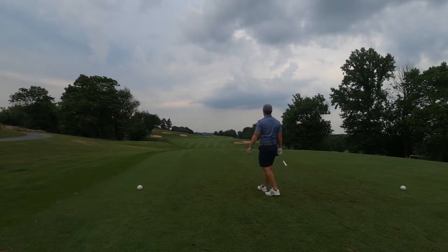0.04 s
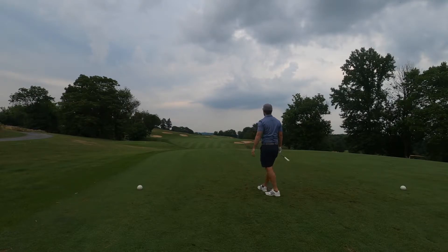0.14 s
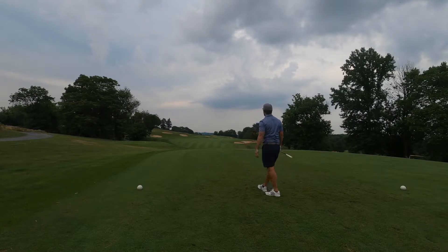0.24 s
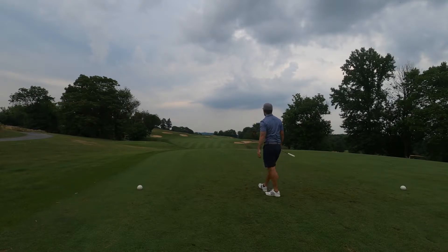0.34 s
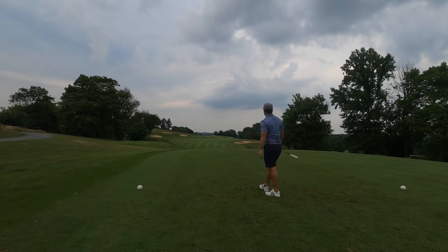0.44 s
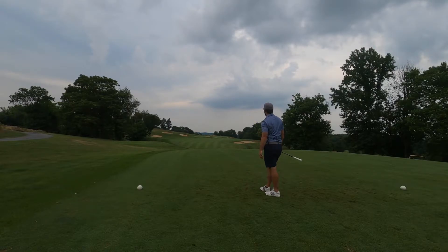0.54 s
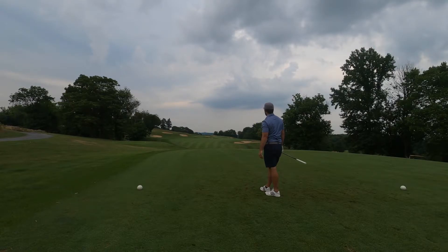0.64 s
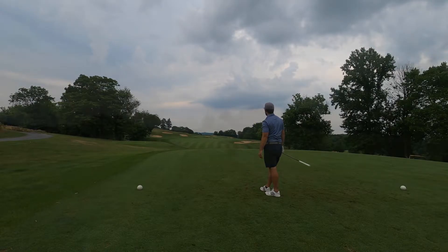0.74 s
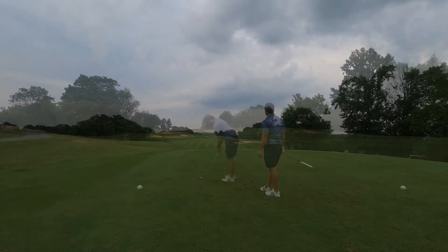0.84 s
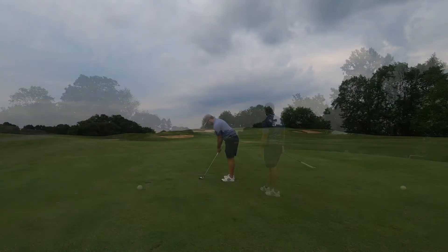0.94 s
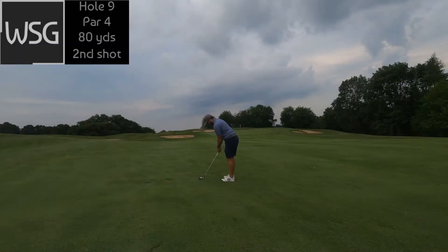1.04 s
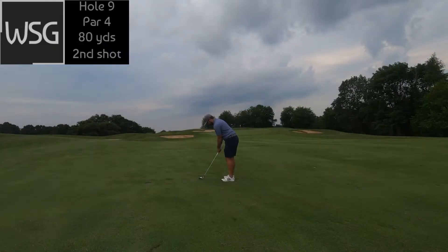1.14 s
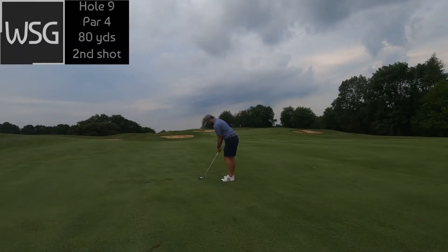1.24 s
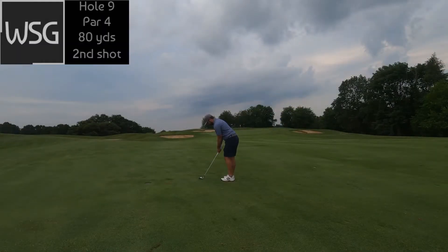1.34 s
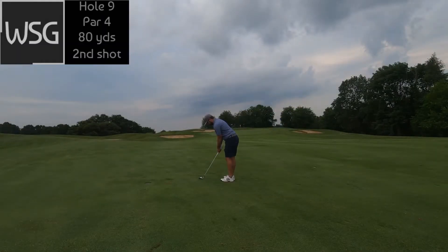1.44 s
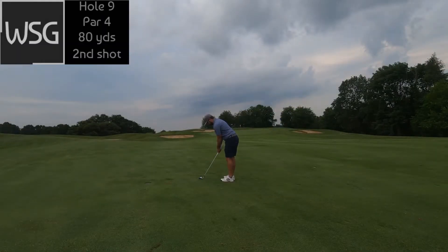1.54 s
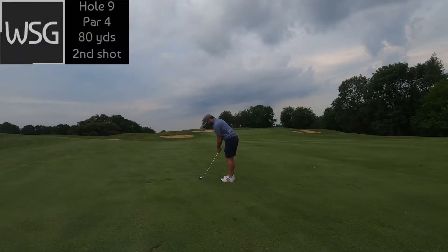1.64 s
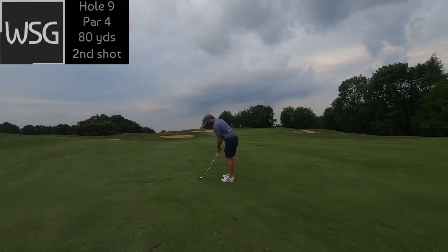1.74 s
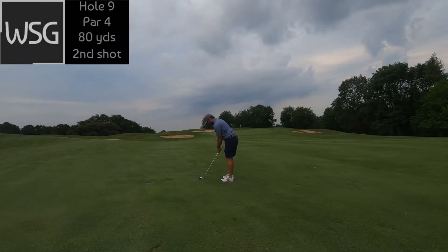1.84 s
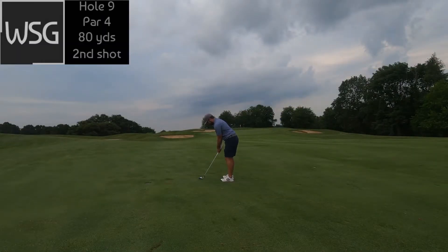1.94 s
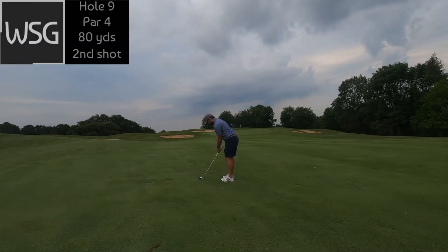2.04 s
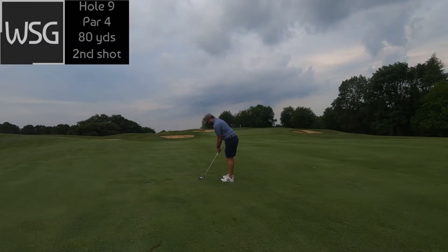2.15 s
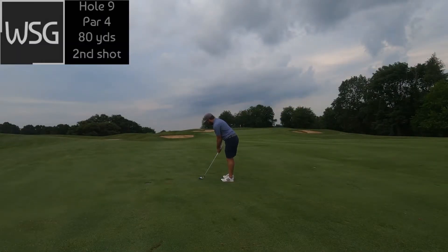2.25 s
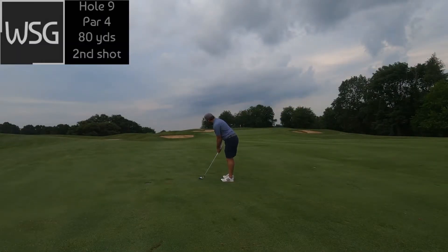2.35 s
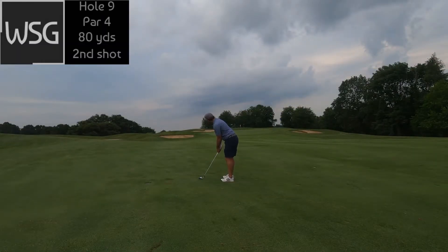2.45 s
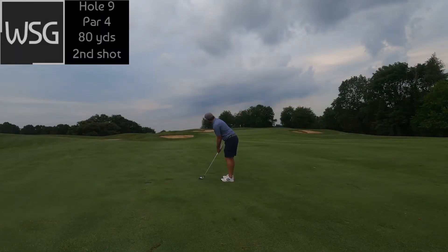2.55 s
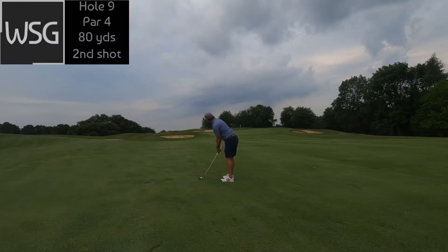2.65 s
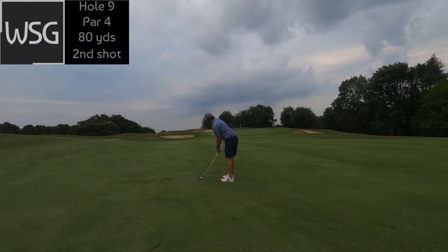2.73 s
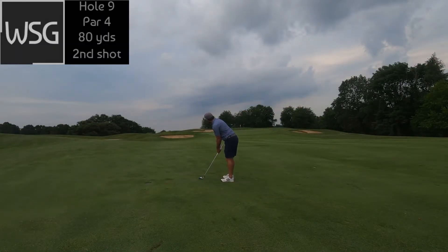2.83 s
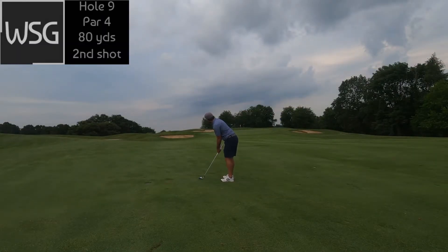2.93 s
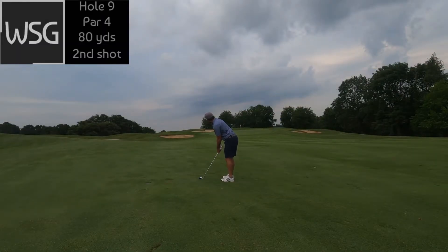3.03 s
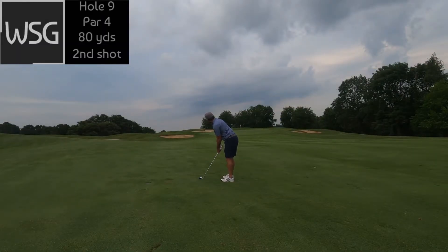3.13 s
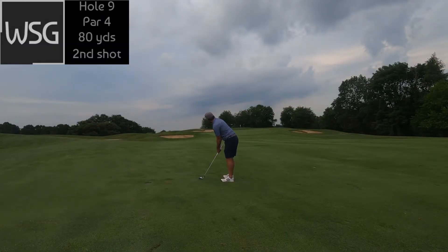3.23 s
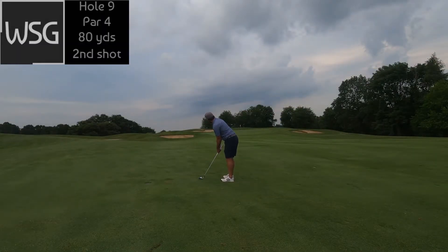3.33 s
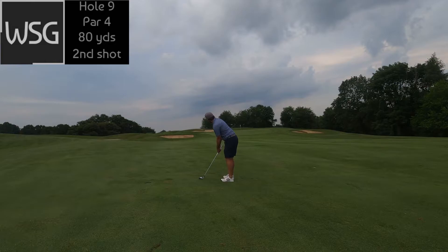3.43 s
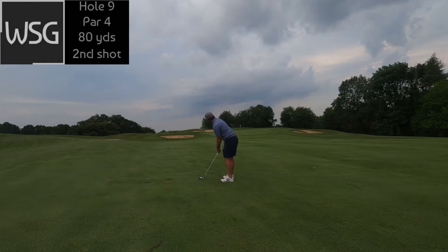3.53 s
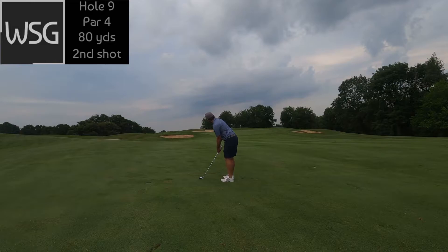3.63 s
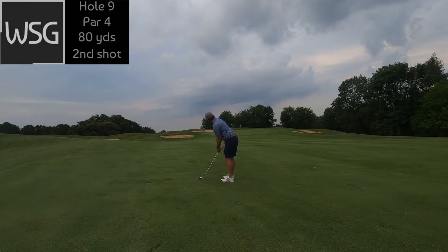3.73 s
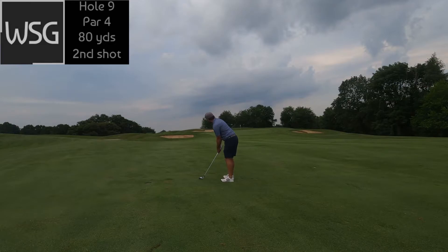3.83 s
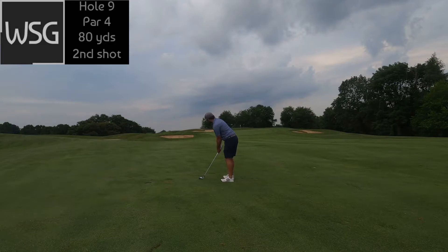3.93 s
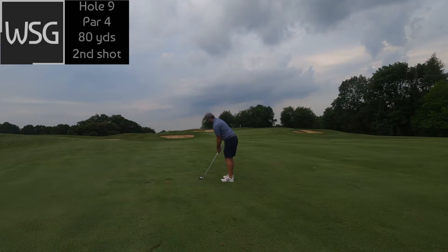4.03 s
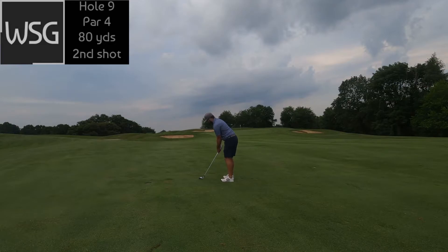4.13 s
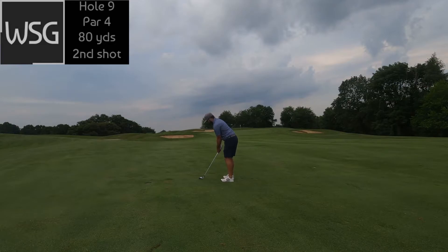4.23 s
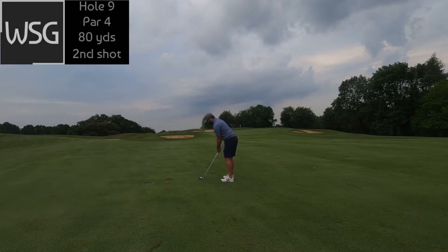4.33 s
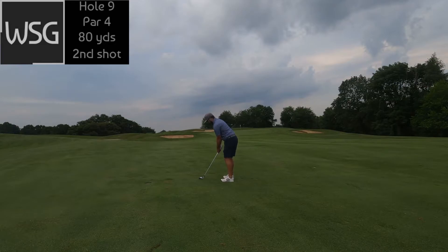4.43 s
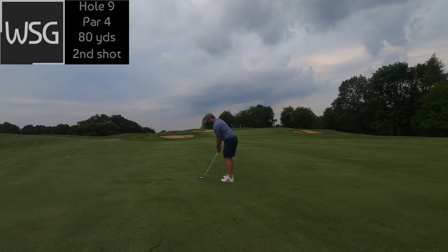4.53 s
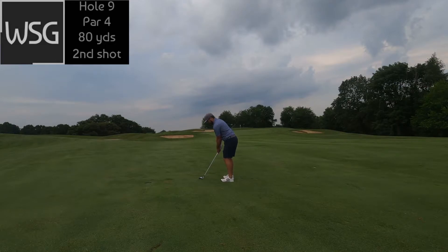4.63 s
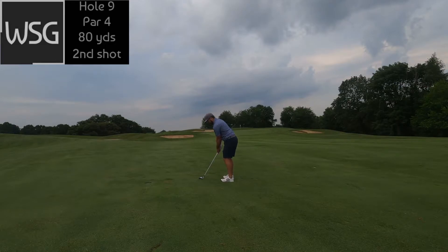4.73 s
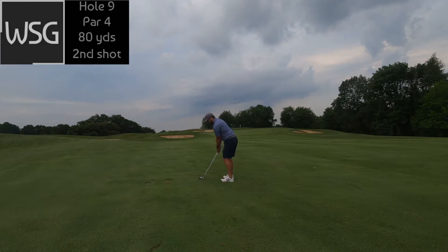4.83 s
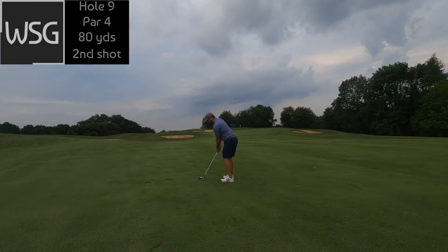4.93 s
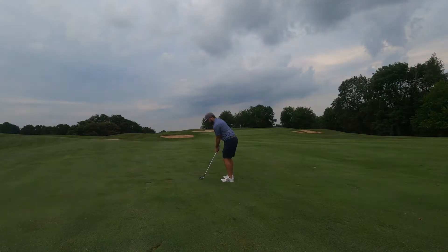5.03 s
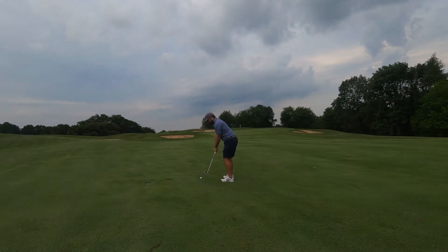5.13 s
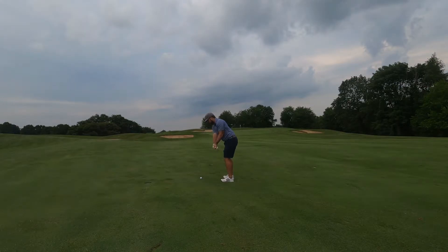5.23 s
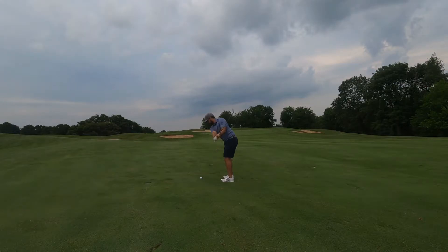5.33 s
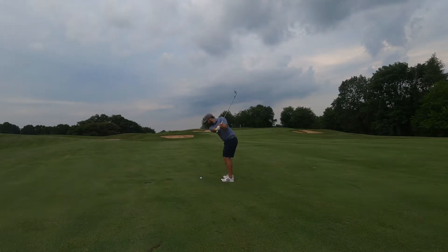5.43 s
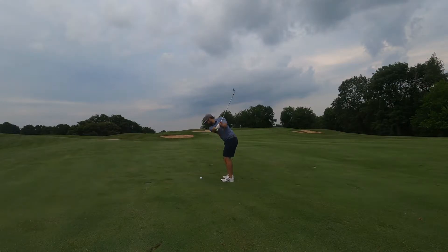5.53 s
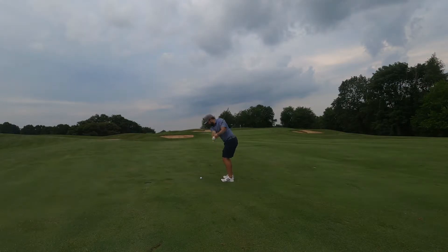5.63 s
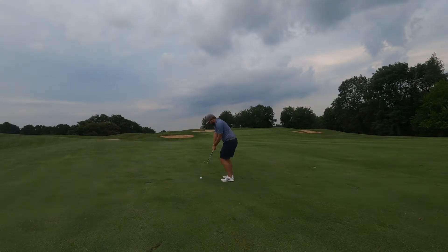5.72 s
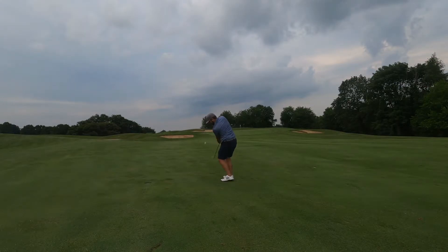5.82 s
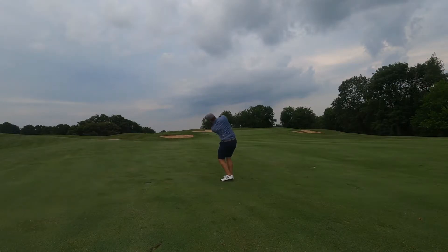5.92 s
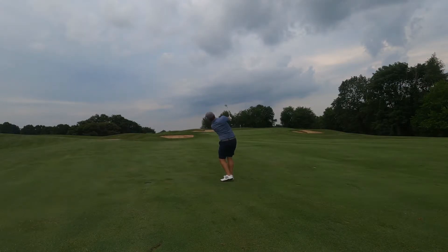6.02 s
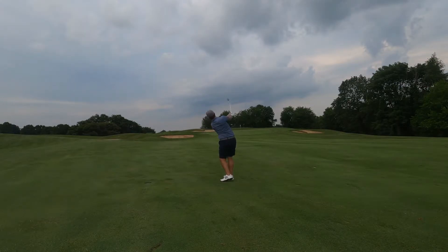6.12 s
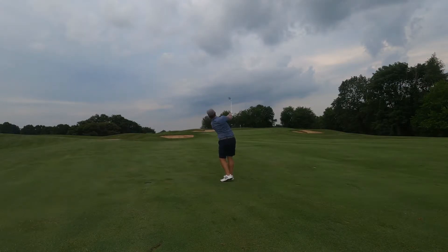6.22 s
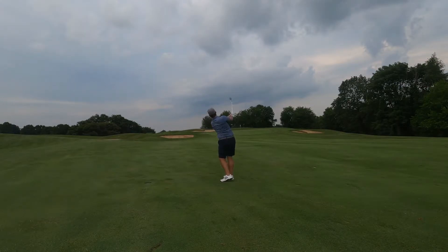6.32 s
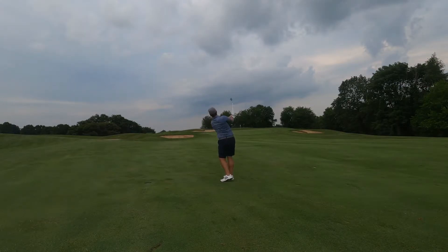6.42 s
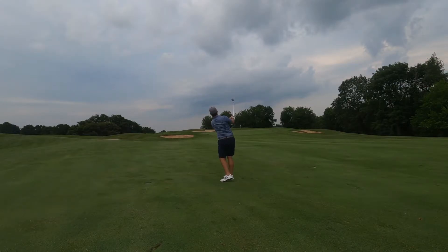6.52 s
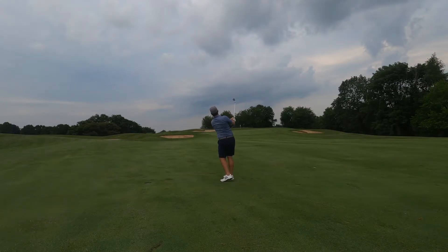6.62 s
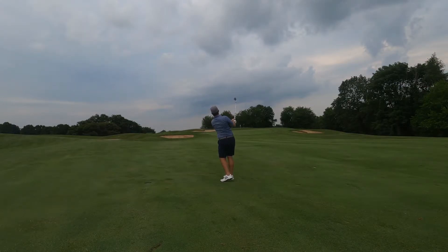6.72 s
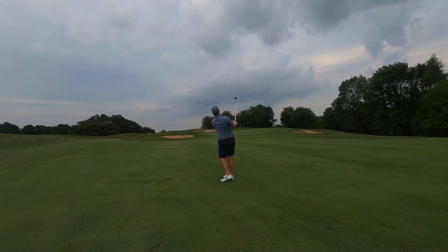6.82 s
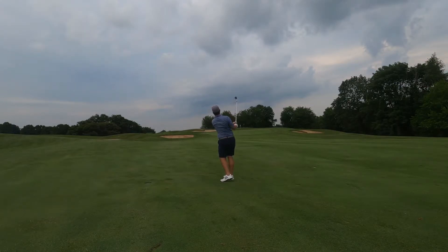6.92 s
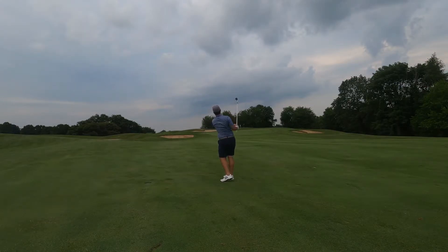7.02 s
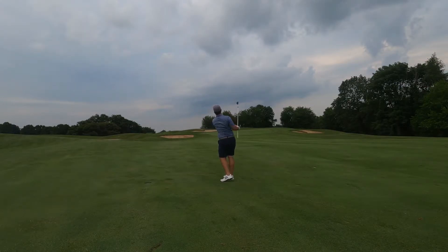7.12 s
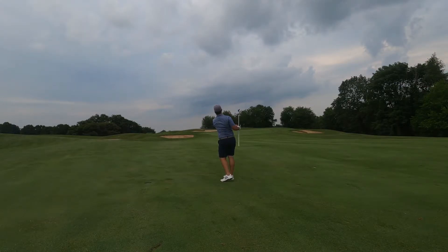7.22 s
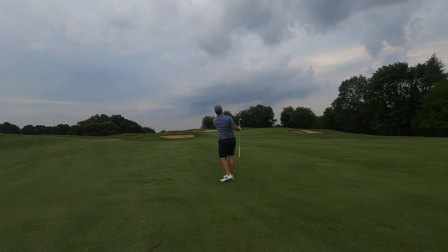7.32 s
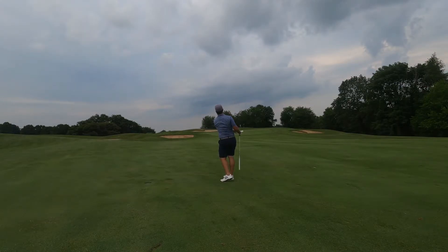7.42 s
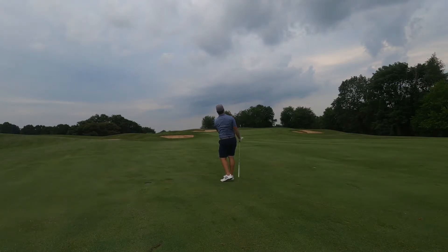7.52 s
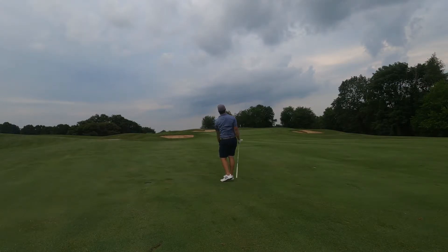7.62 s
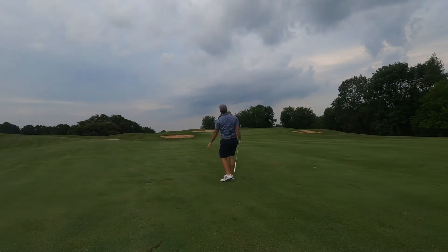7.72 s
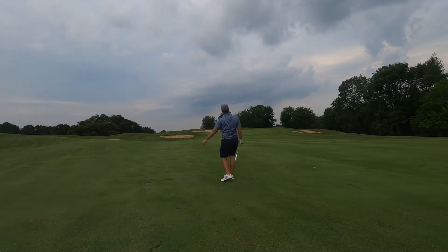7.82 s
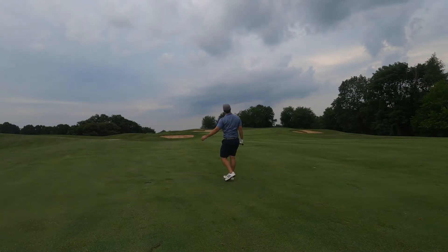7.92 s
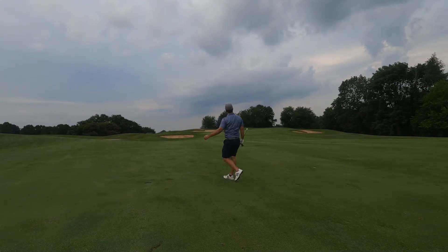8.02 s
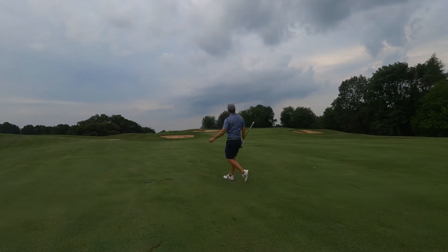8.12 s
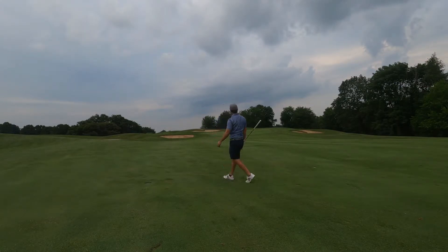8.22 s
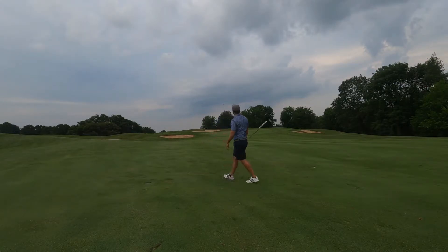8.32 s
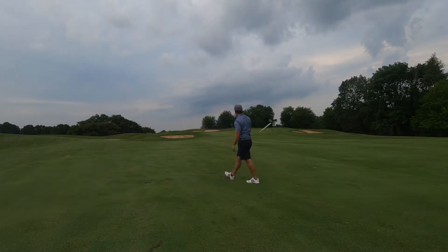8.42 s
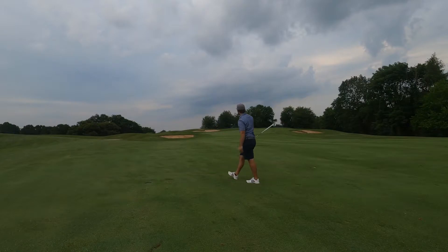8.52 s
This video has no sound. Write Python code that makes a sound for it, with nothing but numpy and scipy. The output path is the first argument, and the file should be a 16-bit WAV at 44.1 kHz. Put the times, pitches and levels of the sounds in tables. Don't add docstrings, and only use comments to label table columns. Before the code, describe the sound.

A single microphone in the open catches wind rumble, soft airy hiss and a distant mower engine. After a second the background blends into a calmer spot with sparse bird chirps and a brief reedy trill. The mower slows to a lower drone. One loud, very short golf shot follows: swish, crisp click, turf scrape, dull thud. Then birds, light rustle and wind.

```python
import sys
import numpy as np
from scipy import signal
from scipy.io import wavfile

SR = 44100
rng = np.random.default_rng(int(sys.argv[2]) if len(sys.argv) > 2 else 0)


def invert_db(x):
    u = np.asarray(x, float) / 20
    return 10 ** u


def digitize_waveform(pressure):
    field = np.atleast_2d(pressure).T
    bounded = np.clip(field, -1, 1)
    quanta = np.round(bounded * 32767).astype(np.int16)
    wavfile.write(sys.argv[1], SR, quanta)


N = 377485
TIME = np.arange(N) / SR

# time in seconds, peak in dB, seconds to fall 10 dB either side.
GUSTS = [(.1, -31.5, 0.1182), (.35, -37, 0.0319), (.56, -38, .2), (.8, -39, .1), (1.18, -45, 0.09),
         (1.6, -42, 0.17), (1.95, -44, 0.2), (2.35, -51, 0.24), (2.95, -46, 0.06), (3.28, -56.5, 0.31),
         (3.95, -46.5, 0.3969), (4.98, -46.5, 0.04), (5.52, -48, 0.1563), (5.85, -52, 0.01),
         (6.5, -52, 0.17), (6.95, -48.5, 0.02), (7.42, -48, 0.0242), (7.64, -47.5, 0.1), (8.1, -44.5, 0.52)]
# frequency in Hz, density in dB per Hz.
WIND_COLOUR = [(2.5, -12), (4, 1), (8, 2), (14, -3), (20, -11), (30, -23), (50, -38)]
RUMBLE_COLOUR = [(15, -21.5), (25, -6), (36, -11), (86, -3.5), (157, -11.5), (237, -15.5), (380, -29),
                 (580, -55)]
ROAR_COLOUR = [(240, -33.5), (400, -6), (665, -0.5), (882, 0.5), (1120, -2.5), (1330, -3), (2600, -9.5),
               (3600, -40)]
HISS_COLOUR = [(1300, -25.5), (2200, -4), (2500, 2.5), (3500, -2), (6500, -3), (9500, -7), (12500, -9.5),
               (20000, -6.5)]
SWISH_COLOUR = [(300, -10.5), (500, 0.5), (1500, -2), (4000, -10), (10500, -18.5)]
TURF_COLOUR = [(240, -20), (400, 5), (800, -5), (1950, -8), (2800, -11.5), (4500, -13.5), (9500, -10.5),
               (17500, -27)]
# time in seconds, engine cycle rate in Hz, level in dB.
MOWER_NEAR = [(0, 24.59, -55.5), (.4, 24.2, -53), (.75, 24.38, -49.5), (.9, 24.49, -59.5),
              (1.1, 23.54, -68.5)]
MOWER_FAST = [(0.9, 24.11, -69), (1.01, 23.09, -55.5), (1.25, 23.69, -53.5), (1.99, 23.73, -56.5),
              (2.29, 24.06, -54), (2.77, 23.64, -56), (3.49, 22.88, -55), (3.8, 22.29, -58.5),
              (4.1, 21.7, -62.5)]
MOWER_SLOW = [(3.95, 19.2, -62), (5.6, 19.1, -60), (6.5, 19.2, -59), (7, 19.7, -59), (7.6, 20.1, -59),
              (8.1, 20.8, -59), (8.56, 20.9, -59)]
# multiple of the cycle rate, level in dB.
NEAR_ORDERS = [(1, -17.5), (2, -0.5), (3, -5.5), (4, -14.5), (5, -17.5), (6, -5.5), (7, -8.5), (8, -6),
               (9, -22), (10, -16), (11, -23.5), (12, -15.5), (13, -12), (14, -26.5), (15, -20.5),
               (16, -24.5), (17, -19.5), (18, -24), (19, -25), (20, -25), (21, -25), (29, -28), (33, -28)]
FAST_ORDERS = [(1, -15.5), (2, -4.5), (3, -5.5), (4, -6), (5, -8), (6, -7.5), (7, -17.5), (8, -9.5),
               (9, -16.5), (10, -15), (11, -27.5), (12, -20), (13, -24), (14, -27), (15, -24.5),
               (16, -36.5)]
SLOW_ORDERS = [(1, -4.5), (2, -6), (3, -3), (4, -2), (5, -2), (6, -5.5), (7, -11), (8, -5), (9, -11.5),
               (10, -12), (11, -12.5), (12, -14.5)]
# time in seconds, level in dB.
WHINE_FAST = [(.9, -103), (1.4, -80), (2.2, -79), (3.3, -77.5), (3.7, -87)]
WHINE_SLOW = [(3.9, -93), (7.9, -90.5), (8.2, -74), (8.56, -70.5)]
# time in seconds, swell in dB, tilt in dB per octave.
AIR = [(0, -0.5, -4.5), (.48, 0.5, -3.5), (1.2, -0.5, -0.5), (1.64, 1, -1.5), (2.3, -2.5, -1.5),
       (3.57, 2.5, -1.5), (3.93, -2, -1), (4.15, -0.5, -3.5), (4.67, -3, -3.5), (5.53, 1, -1.5),
       (6.8, 1, -0.38), (7.5, 1.5, 1.2), (8.56, -.5, -1)]
# time in seconds, level in dB.
CLATTER = [(0, -95), (6.4, -90), (6.65, -77), (7.2, -75), (7.7, -74), (8, -77), (8.2, -88), (8.56, -95)]
HUM = [(0, -77), (2.8, -77.5), (3.3, -61.5), (5.5, -66), (6.5, -61), (8.56, -69.5)]
RUSTLE = [(0, -96.5), (6.2, -85), (6.7, -81), (7.3, -74.5), (7.9, -77), (8.56, -78.5)]
# start in seconds, length in seconds, pitch in Hz, level in dB.
WHISTLES = [(.097, 0.05, 3470, -80), (.315, 0.055, 3400, -85), (.69, 0.073, 5720, -81),
            (.88, 0.039, 3110, -82.5), (1.428, 0.027, 2890, -73), (2.352, 0.028, 2340, -76),
            (2.445, 0.02, 2260, -76.5), (2.47, .035, 2230, -81), (1.578, .016, 7650, -80),
            (3.975, 0.073, 2750, -77), (4.072, .105, 2750, -71), (4.685, 0.0245, 7650, -78.5),
            (6.328, 0.064, 2670, -75), (6.525, 0.0507, 5780, -75.5), (6.583, 0.025, 4530, -79),
            (6.92, 0.042, 5645, -78.5), (6.972, .022, 4500, -80), (7.555, 0.027, 4340, -75),
            (7.69, 0.026, 4550, -79), (8.11, 0.074, 6950, -75), (8.2, 0.055, 7050, -87),
            (8.4, 0.066, 3440, -76.5), (8.47, 0.0206, 5550, -80), (8.49, 0.04, 7420, -74.5)]
COOS = [(4.15, 0.117, 1000, -81), (4.29, .27, 712, -80), (4.53, 0.212, 804.5, -78),
        (4.86, 0.113, 808, -78.5)]
RISES = [(1.46, 0.0144, 4720, -79.5), (1.605, .03, 3180, -77.5), (1.63, .015, 4700, -81),
         (2.395, .035, 2820, -74), (2.525, .025, 3050, -78), (2.24, .07, 2330, -79),
         (2.934, 0.024, 3200, -77), (3.116, .024, 3070, -76), (3.61, .028, 2530, -78),
         (5.74, .04, 2700, -80.5), (5.935, 0.022, 3280, -75), (6.14, 0.026, 8220, -81),
         (7.562, .015, 3390, -72)]
DROPS = [(2.428, .02, 2700, -80), (2.125, .02, 5200, -81), (3.012, .02, 2200, -80),
         (7.265, 0.0295, 3840, -75.5), (7.425, 0.028, 3600, -75), (7.575, 0.0245, 3800, -73),
         (7.715, 0.0364, 4030, -76)]
SLIDES = [(1.79, .03, 7810, -83), (2.2, 0.02, 4130, -81), (2.998, .013, 2500, -71),
          (2.318, .025, 2300, -79), (5.34, 0.049, 2382, -81.5), (5.955, 0.052, 2617, -71.5),
          (6.435, .055, 2094, -76.5), (8.54, 0.019, 5590, -79.5)]
HOOKS = [(1.642, 0.042, 2880, -76.5), (1.82, .042, 2860, -78), (2.957, 0.032, 2860, -69.5),
         (3.14, .035, 2810, -71), (8.525, 0.029, 6660, -74)]
DIPS = [(1.413, .057, 6350, -75), (1.592, .046, 6850, -77)]
ARCHES = [(7.413, 0.026, 5080, -71.5), (7.585, .035, 5234, -72.5)]
KINDS = [(WHISTLES + COOS, 0, 0), (RISES, -.09, .07), (DROPS, 0.1097, -.12), (SLIDES, 0.0425, -0.046),
         (HOOKS, .11, -.003), (ARCHES, -0.0592, -0.0775), (DIPS, .17, .16)]
# start in seconds, level in dB, centre in Hz, t60 in seconds.
TICKS = [(0.26, -59.5, 5100, 0.061), (0.43, -60, 5900, 0.044), (0.605, -62, 5500, .06),
         (4.86, -58, 3750, 0.187), (6.5, -57.5, 3230, 0.206), (8.273, -49, 4200, 0.0313),
         (7.03, -65, 8000, 0.042), (2.55, -60.5, 4000, 0.062)]
# time in seconds, base pitch in Hz, level in dB, side partials in dB, ninth
# partial in dB.
HELD = [(3.655, 548, -86, -20, 0), (3.668, 547, -66, -20, -4), (3.684, 551, -62, -12, -14),
        (3.703, 557, -66.5, 1, 0), (3.73, 557.4, -67.5, 0, 4), (3.765, 558, -68, -4, 3),
        (3.78, 560, -71, -11.5, 6), (3.795, 568, -67.5, -20, -4), (3.812, 578, -78, -20, 0)]
# multiple of the base pitch, level in dB.
HELD_PARTIALS = [(5, -7), (6, 5.5), (7, -11), (8, -12), (9, -9), (10, -16.5)]
# centre in Hz, rise within a beat in Hz, level in dB, lag in beats, steady share 0-1.
TRILL_VOICES = [(2800, -350, -3, 0.49, .4), (3150, 200, -7, .5, .8), (3520, 650, 1, .03, 0.33),
                (4620, 650, 1, 0.037, .1), (5080, 150, -12, .3, .6)]
# time in seconds, level in dB, tilt in dB per octave.
SWISH = [(5.765, -85, -3), (5.785, -67, -2.5), (5.81, -63.5, -1.5), (5.832, -60.5, 0.6), (5.845, -61, 0.2),
         (5.856, -63, -1), (5.87, -85, 0)]
# start in seconds, level in dB,
# hold in seconds (sign ignored).
TURF = [
    (5.851, -50, -0.0027),
    (5.8543, -32, .0145),
    (5.868, -62, 0.02),
]
# frequency in Hz, signed height, t60 in seconds.
BALL = [(300, .026, .08), (509, -.041, .08), (623, -.028, .08), (981, -.436, .0063), (1125, -.138, .068),
        (1334, -.306, .08), (1436, 1.071, .0086), (1875, .037, .052), (2153, .03, .08), (3118, -.024, .022),
        (3769, .068, .0195), (3916, .087, .0108)]
FACE = [(5103, -0.211, 0.003), (6048, 0.069, 0.003), (7043, 0.202, 0.0048), (7447, 0.066, 0.0062),
        (9349, -0.079, 0.0161), (11668, 0.026, 0.005)]
# frequency in Hz, level in dB, t60 in seconds.
SHAFT = [(5580, -36, .03), (7620, -36, .03), (9300, -33, .04), (13100, -46, .06), (14250, -40, .04)]
THUD = [(84, -42, 0.07), (125, -30, .05), (175, -32, .045), (275.5, -38, 0.05), (353.7, -32, 0.04),
        (640, -31, .04)]

TOUCH_S, BALL_LAG_S, CONTACT_S, RELEASE_SHARE = 5.854938, .00017, .000363, .75
SWING = slice(round(5.7 * SR), round(6.1 * SR))
RINGING = slice(round(5.85 * SR), round(6.1 * SR))


def rms_one(x):
    return x / np.sqrt(np.mean(x ** 2) + 1e-20)


def in_time(rows):
    s, *columns = np.transpose(rows)
    return [np.interp(TIME, s, c) for c in columns]


def window(rows, fade_s):
    since_start_s = TIME - rows[0][0] + fade_s
    to_end_s = rows[-1][0] + fade_s - TIME
    return np.clip(np.minimum(since_start_s, to_end_s) / fade_s, 0, 1)


def drift(rate_hz, size=N, step=1):
    r = np.exp(-80 * np.pi * rate_hz / SR)
    white = rng.standard_normal(N // 40 + 2042)
    slow = rms_one(signal.lfilter([1], [1, -2 * r, r * r], white)[2000:])
    return np.interp(np.arange(size) * step / 40, np.arange(len(slow)), slow)


def band(x, low_hz, high_hz, step=1):
    edges_hz = [low_hz, min(high_hz, .45 * SR)]
    return signal.sosfilt(signal.butter(2, edges_hz, "band", fs=SR / step, output="sos"), x)


def coloured(colour, patchy_db, tilt_db=0, size=N, step=1):
    hz, level_db = np.transpose(colour)
    edges_hz = hz[0] * 2 ** np.arange(0, np.log2(hz[-1] / hz[0]), 1 / 3)
    count, run_in = size // step + 1, SR // step
    white = rng.standard_normal((2, count + run_in))
    tilt_db = np.resize(np.broadcast_to(tilt_db, size)[::step], count)
    flat, tilted = 0, 0
    for k, (low_hz, high_hz) in enumerate(zip(edges_hz, edges_hz[1:])):
        centre_hz = np.sqrt(low_hz * high_hz)
        db = np.interp(np.log(centre_hz), np.log(hz), level_db)
        db = db - 150 * (centre_hz > .4 * SR / step)
        part = band(white[k % 2], low_hz, high_hz, step)[run_in:] * invert_db(db) if db > -60 else 0
        flat = flat + part
        flicker_db = patchy_db * drift(5.04, count, step)
        tilted = tilted + part * invert_db(flicker_db + tilt_db * np.log2(centre_hz / 1000))
    return signal.resample_poly(tilted, step, 1)[:size] / np.sqrt(np.mean(flat ** 2))


def wind():
    s = TIME[::40]
    calm = invert_db(-63.5)
    level = calm + sum(invert_db(db - 10 * np.abs(s - at_s) / fall_s) for at_s, db, fall_s in GUSTS)
    return np.interp(TIME, s, level) * coloured(WIND_COLOUR, patchy_db=1.5, step=40)


def mower(run, orders, whine=None):
    cycle_hz, level_db = in_time(run)
    angle = 2 * np.pi * np.cumsum(cycle_hz * (1 + .006 * drift(5))) / SR
    heard = window(run, fade_s=0.21)
    on = heard > 0
    tone = np.zeros(N)
    for k, db in orders:
        waver = np.repeat(drift(5, N // 20 + 1, step=20), 20)[:N][on]
        level = invert_db(db + (1.5 + .06 * k) * waver)
        tone[on] += level * np.sin(k * angle[on] + rng.uniform(0, 2 * np.pi))
    tone = invert_db(level_db) * tone
    if whine:
        tone = tone + invert_db(in_time(whine)[0] + 2.1 * drift(9.0)) * np.sin(48 * angle)
    return tone * heard


def spots(first_db, second_db):
    fade_start_s, fade_s = 0.735, 0.364
    share = np.clip((TIME - fade_start_s) / fade_s, 0, 1)
    return np.hypot((1 - share) * invert_db(first_db), share * invert_db(second_db))


def clatter():
    puff_hz, puff_s = 20.0, 7.2905
    puffs = (.5 + .5 * np.cos(2 * np.pi * puff_hz * (TIME - puff_s))) ** 6
    noise = rms_one(band(rng.standard_normal(N), 1500, 1900))
    return invert_db(in_time(CLATTER)[0] + 6.5) * puffs * noise


def leaves():
    noise = rms_one(band(rng.standard_normal(N), 3500, 7600))
    return invert_db(in_time(RUSTLE)[0] + 1.5 * drift(14)) * noise


def air():
    swell_db, tilt_db = in_time(AIR)
    rumble = spots(-54, -59.5) * invert_db(swell_db) * coloured(RUMBLE_COLOUR, patchy_db=0.5, step=10)
    roar = spots(-69.5, -68.5) * invert_db(.1 * swell_db + 0.32 * tilt_db)
    roar = roar * coloured(ROAR_COLOUR, patchy_db=0.21, tilt_db=tilt_db, step=4)
    hum = invert_db(in_time(HUM)[0] + 1.5 * drift(2.5)) * np.sin(2 * np.pi * 82 * TIME)
    hiss = spots(-72.5, -73.5) * invert_db(0.18 * tilt_db) * coloured(HISS_COLOUR, patchy_db=1.0)
    top_cut = signal.cheby2(24, 60, 15950, fs=SR, output="sos")
    return rumble + roar + hum + signal.sosfilt(top_cut, hiss)


def birds():
    out = np.zeros(N + SR)
    for notes, first, last in KINDS:
        for start_s, length_s, hz, db in notes:
            u = np.linspace(-1, 1, round(length_s * SR))
            vibrato = .003 * np.sin(rng.uniform(0, 2 * np.pi) + 190 * length_s * u)
            bend = (last - first) / 2 * u + (first + last) / 2 * u ** 2
            pitch_hz = hz * (1 + vibrato + bend)
            envelope = invert_db(db + 4.5) * (1 - u ** 2) ** 0.21
            out[round(start_s * SR):][:len(u)] += envelope * np.sin(2 * np.pi * np.cumsum(pitch_hz) / SR)
    return out[:N] * invert_db(3 * drift(200))


def trees(x):
    level_db, start_s, t60_s = -7, .006, .3
    age_s = TIME[:SR // 5]
    sparse = rng.standard_normal(len(age_s)) * (rng.random(len(age_s)) < .02)
    cloud = sparse * invert_db(-60 * age_s / t60_s) * (age_s > start_s)
    return x + invert_db(level_db) * signal.fftconvolve(x, cloud / np.linalg.norm(cloud))[:N]


def ticks():
    out, age_s = np.zeros(N + SR), TIME[:SR // 4]
    for start_s, db, hz, t60_s in TICKS:
        burst = band(rng.standard_normal(len(age_s)), hz * 0.45, hz * 1.345)
        envelope = invert_db(db - 60 * age_s / t60_s) * np.minimum(age_s / 0.0015, 1)
        out[round(start_s * SR):][:len(age_s)] += envelope * burst
    return out[:N]


def held_note():
    base_hz, level_db, side_db, ninth_db = in_time(HELD)
    angle = 2 * np.pi * np.cumsum(base_hz) / SR
    note = 0
    for k, db in HELD_PARTIALS:
        partial_db = db + side_db * (k % 3 > 0) + ninth_db * (k == 9)
        note = note + invert_db(partial_db) * np.sin(k * angle)
    return note * invert_db(level_db + 1.1 * drift(60.0)) * window(HELD, fade_s=.005)


def trill():
    start_s, beat_hz, level_db = 3.8095, 40.6, -71.5
    rasp_hz, climb_hz_per_beat = 155, 8
    beats, out = (TIME - start_s) * beat_hz, 0
    rasp, flutter = drift(300.0), drift(150.0)
    climb_hz = climb_hz_per_beat * np.clip(beats - 7, -7, 7)
    for k, (hz, rise_hz, db, lag_beats, steady) in enumerate(TRILL_VOICES):
        within, own = (beats - lag_beats) % 1, k * SR
        pitch_hz = hz + rise_hz * (within - .5) + climb_hz + rasp_hz * np.roll(rasp, own)
        puff = (np.sin(np.pi * within) ** 4 + steady) * invert_db(db + 3.02 * np.roll(flutter, own))
        out = out + puff * np.sin(2 * np.pi * np.cumsum(pitch_hz) / SR)
    gate = np.clip(np.minimum(3 * beats, 13.6 - beats), 0, 1)
    return invert_db(level_db + 3.0) * out * gate


def brush(level, tilt_db, colour):
    out = np.zeros(N)
    out[SWING] = level * coloured(colour, patchy_db=0, tilt_db=tilt_db, size=len(level))
    return out


def swish():
    level_db, tilt_db = in_time(SWISH)
    level = invert_db(level_db) * window(SWISH, fade_s=.001)
    return brush(level[SWING], tilt_db[SWING], SWISH_COLOUR)


def turf():
    s, level = TIME[SWING], 0
    for start_s, db, hold_s in TURF:
        age_s = s - start_s
        sag_db = 700 * np.abs(age_s) + 6 * (age_s / hold_s) ** 4
        level = level + invert_db(db - sag_db) * np.clip(age_s / .001, 0, 1)
    tilt_db = 1.5 - 350 * np.clip(s - TOUCH_S - .008, 0, .015)
    return brush(level, tilt_db, TURF_COLOUR)


def ring(modes, start_s):
    age_s = np.maximum(TIME[RINGING] - start_s, 0)
    out = np.zeros(N)
    for hz, height, t60_s in modes:
        out[RINGING] += height * invert_db(-60 * age_s / t60_s) * np.sin(2 * np.pi * hz * age_s)
    return out


def ring_db(modes, start_s):
    return ring([(hz, invert_db(db), t60_s) for hz, db, t60_s in modes], start_s)


def choke(after_s):
    return invert_db(-3600 * np.clip(TIME - TOUCH_S - after_s, 0, .1))


def kicked_twice(modes, start_s):
    return ring(modes, start_s) + RELEASE_SHARE * ring(modes, start_s + CONTACT_S)


def strike():
    face = kicked_twice(FACE, TOUCH_S)
    ball = kicked_twice(BALL, TOUCH_S + BALL_LAG_S) * choke(.0053)
    ground = invert_db(-4.8) * np.roll(ball, round(.00121 * SR))
    shaft = ring_db(SHAFT, TOUCH_S) * choke(.013)
    return face + ball + ground + shaft


def thud():
    start_s, rise_s = 5.859, .007
    return ring_db(THUD, start_s) * (1 - np.exp(-np.maximum(TIME - start_s, 0) / rise_s))


def scene():
    near = mower(MOWER_NEAR, NEAR_ORDERS)
    fast = mower(MOWER_FAST, FAST_ORDERS, WHINE_FAST)
    slow = mower(MOWER_SLOW, SLOW_ORDERS, WHINE_SLOW)
    beds = wind() + near + fast + slow + air() + clatter() + leaves()
    calls = trees(birds() + held_note() + trill())
    shot = swish() + turf() + strike() + thud()
    return (beds + calls + ticks() + shot)[None]


def band_limit(x):
    return signal.sosfilt(signal.butter(12, 16510, fs=SR, output="sos"), x)


def record(dry):
    top_cut = signal.cheby2(16, 70, 16600, fs=SR, output="sos")
    mix = signal.sosfilt(top_cut, dry)
    return band_limit(mix)


dry = scene()
out = record(dry)
digitize_waveform(out)
```